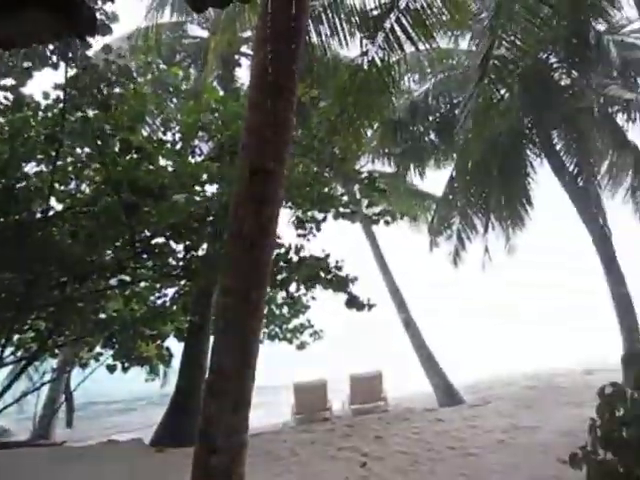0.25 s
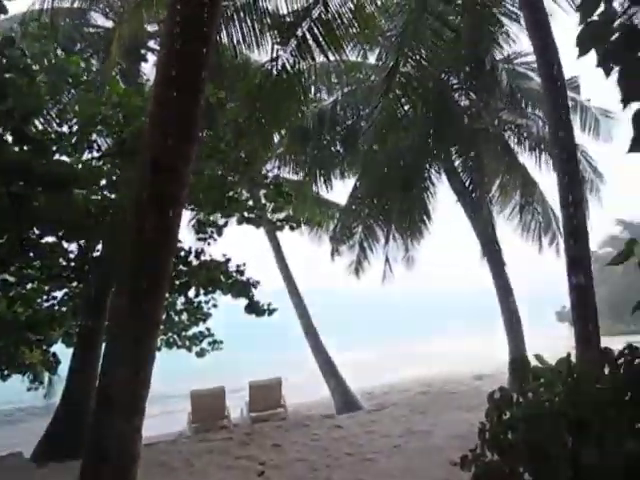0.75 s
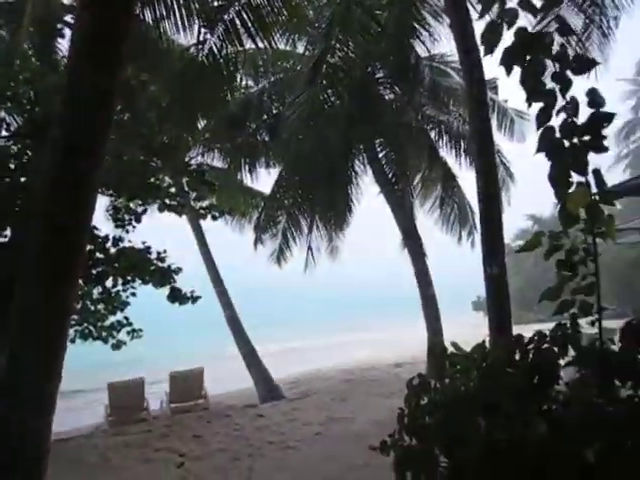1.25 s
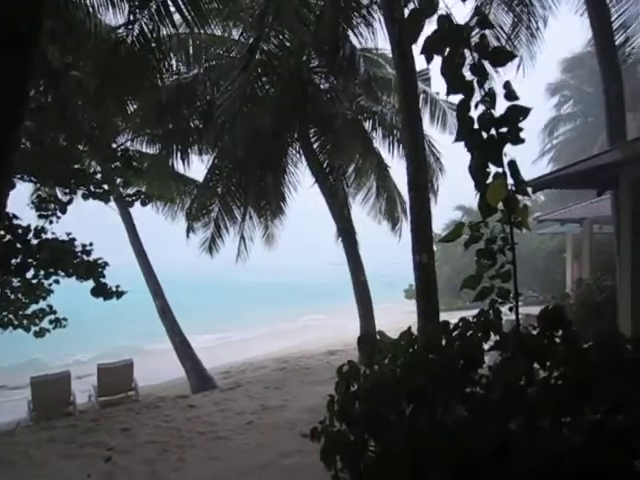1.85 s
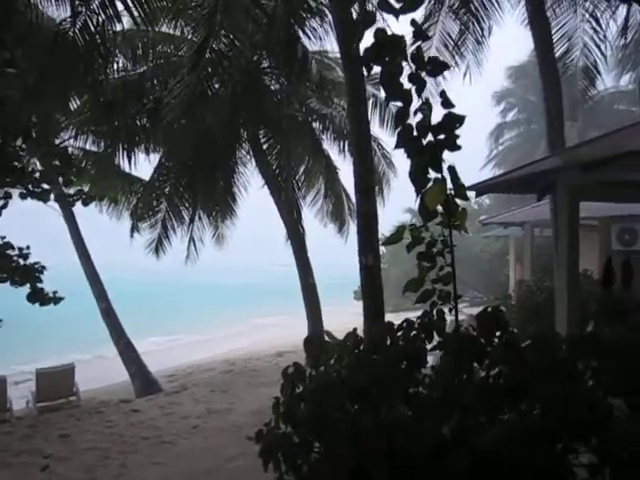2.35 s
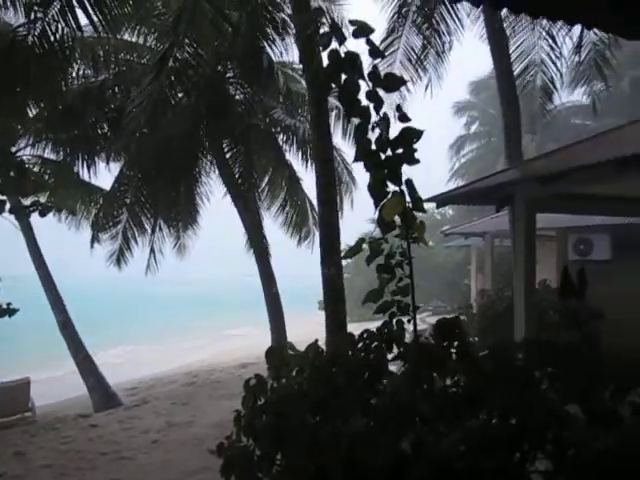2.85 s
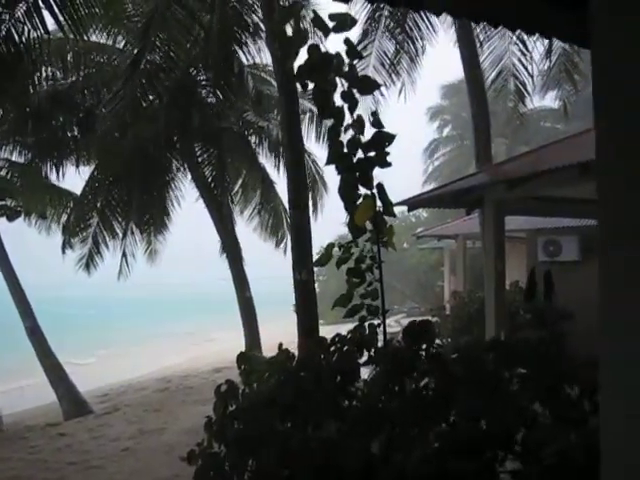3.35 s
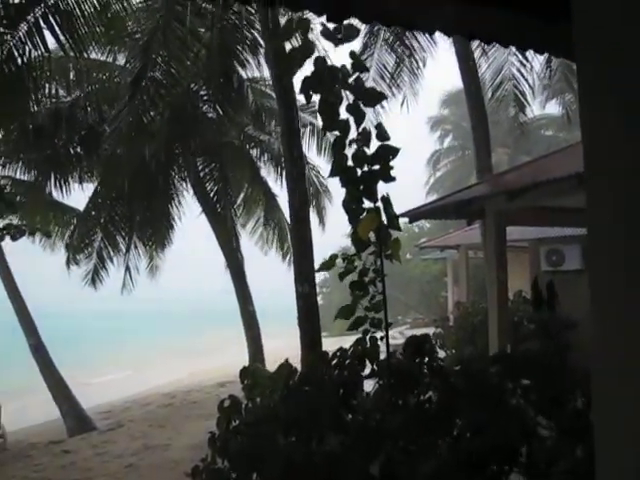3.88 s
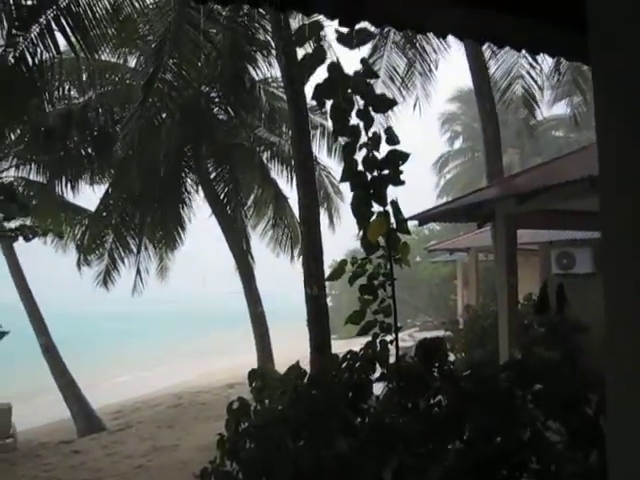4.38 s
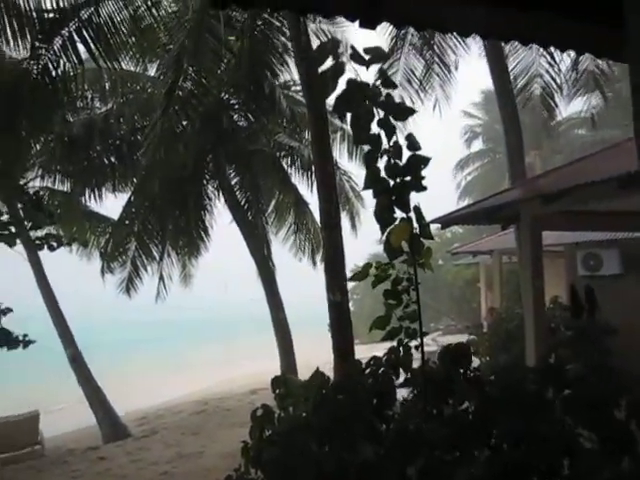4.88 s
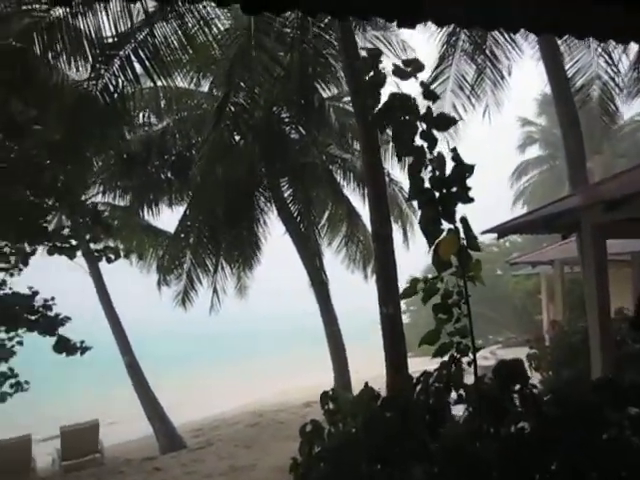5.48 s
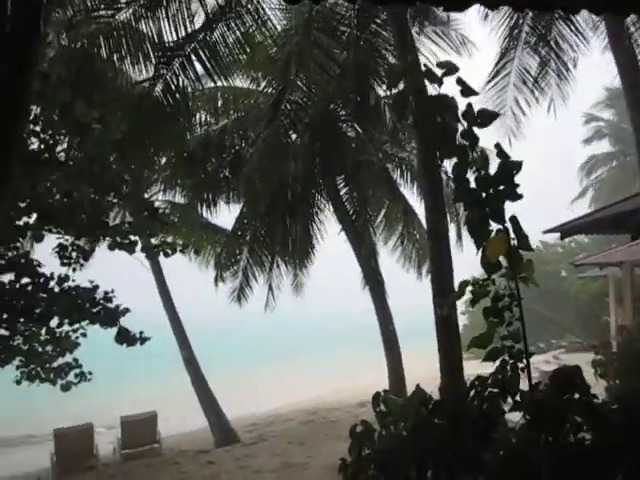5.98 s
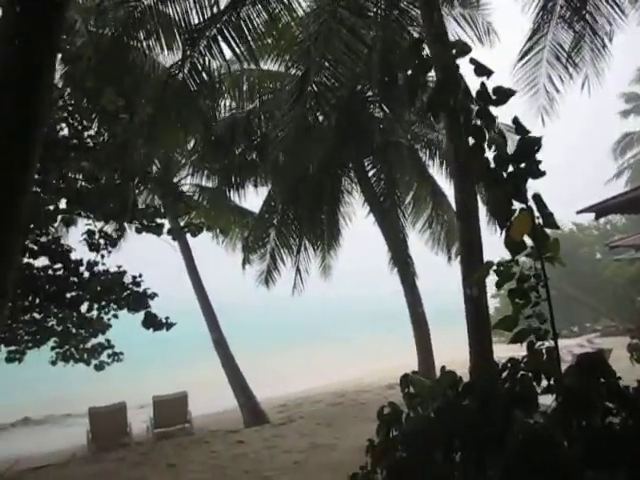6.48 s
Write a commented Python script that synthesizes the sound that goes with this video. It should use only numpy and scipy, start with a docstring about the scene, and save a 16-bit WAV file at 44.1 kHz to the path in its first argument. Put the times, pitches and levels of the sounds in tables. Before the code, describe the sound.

Heavy rain is already pouring at full strength and continues unbroken to the end, about 6.5 seconds. A wide, mid-toned wash of distant rain on beach, sea and roofs lies beneath a bright, fine-grained patter on leaves close by, with many tiny splashes. A sharper drip lands at 0.3 s. Near 1.0 s the sound almost vanishes for a few hundredths of a second, with a faint soft thump at each edge, then swells back. Dull low handling bumps cluster from 1.3 to 1.6 s, and weaker ones around 2.3 to 2.5 s, with slight rumble and crisp drips. The rain surges subtly at 3.3 s. Around 3.8 s the far wash recedes slightly and patter and roof drips become closer. Hard, short smacks hit at 3.9 and 5.9 s, the level dipping briefly after them; lighter drips fall at 4.6, 5.4 and 6.1 s. Mono, outdoors, under eaves, with limited top treble.

```python
"""A broad wash of far rain is heard first, with near drops pattering on leaves: a tropical downpour on a
palm beach, under the eaves of a hut, through a hand-held mono camera. Rain is shaped noise plus damped rings.
Fat roof drips are short noise bursts; a brief cut-out has a soft thump at each edge; handling gives dull
bumps over low rumble. As the camera turns towards the hut the wash recedes, the patter comes closer and more
drips are heard; gain control ducks after the loudest smacks."""
import sys
import numpy as np
from scipy import signal
from scipy.fft import rfft, irfft, next_fast_len
from scipy.io import wavfile
from scipy.ndimage import map_coordinates

SR = 44100
rng = np.random.default_rng(int(sys.argv[2]) if len(sys.argv) > 2 else 0)


def int16_out(signal):
    """Quantize to a 16-bit WAV file."""
    q = np.round(np.clip(np.atleast_2d(signal).T, -1, 1) * 32767)
    wavfile.write(sys.argv[1], SR, q.astype(np.int16))


N = 296793

# relative spectrum of far rain on sand, sea and roofs: f/Hz [Hz], level/dB [dB per Hz]
WASH_SPECTRUM = [(25, -37), (60, -19), (110, -13.5), (290, -7.5), (400, -5.5), (520, -1.5), (680, 0),
                 (1050, 1), (1350, -3), (1800, -3.5), (2500, -3.5), (3200, -9), (7000, -12), (15000, -39)]
# relative spectrum of drops bursting on leaves: f/Hz [Hz], level/dB [dB per Hz]
LEAF_SPECTRUM = [(200, -22), (1000, -3.5), (2500, -0.5), (3200, -1.5), (4200, -1.6), (6000, -2),
                 (9000, -1.3), (12000, -1.5), (13500, -4), (15700, -11)]
# fattest drips landing close by: t/s [s], level/dB [peak dB, before a common lift and the microphone's
# treble loss], f/Hz [centre Hz of the spray], t60/s [s of decay by 60 dB]
FAT_DRIPS = [(.2845, -13.5, 7700, .016), (2.292, -15.5, 11000, .025), (2.4887, -14, 9500, .035),
             (3.863, -7.5, 6200, .0053), (4.63, -16, 6500, .025), (5.358, -14, 10500, 0.02),
             (5.9292, -7, 8550, 0.014), (5.983, -20, 1600, .05), (6.11, -13.5, 6300, .021)]
# start and end of the cut-out: t/s [s], t/s [s]
GAP_TIMES = (0.981, 1.024)
# bumps on the camera body: t/s [s, middle], level/dB [peak dB], f/Hz [Hz]
BODY_BUMPS = [(1.268, -22.5, 200), (1.438, -14.5, 217), (1.504, -15, 290), (1.522, -15, 220),
              (1.602, -26, 55), (1.62, -19.5, 106), (1.629, -19, 310), (2.299, -21, 135), (2.314, -16, 125),
              (2.386, -26, 110), (2.486, -21, 185)]
# relative spectrum of the handling rumble: f/Hz [Hz], level/dB [dB per Hz]
RUMBLE_SPECTRUM = [(10, -7), (30, -11), (60, -3.5), (110, -6), (400, -34), (1500, -80)]
# shifts of the grip: t/s [s, start], hold/s [s], level/dB [dB of rumble]
GRIP_SHIFTS = [(1.38, .2, -36.5), (2.29, 0.28, -39.5), (5.98, .75, -55)]

WASH_DB, WASH_TURN_DB = -25.0, -1.6  # facing the beach, change over the turn
PATTER_DB, PATTER_TURN_DB = -24.75, 0.56
SWELL_DB, SWELLS_PER_S = 0.13, 4  # small random swells of the downpour
SURGE_S, SURGE_WIDTH_S, SURGE_DB = 3.26, .12, 0.5  # one brief surge of heavier rain
SHIFT_ATTACK_S, SHIFT_RELEASE_S = 0.047, 0.13  # time constants of the rumble
STILL_HAND_DB = -62  # rumble between the shifts
TURN_S, TURN_LENGTH_S = 3.8, 0.76  # middle and length of the turn from beach to hut
EAVES_PER_S, EAVES_DB, EAVES_T60_S = 4, -14, .012  # lesser drips off the roof edge
EAVES_LOW_HZ, EAVES_HIGH_HZ = 5000, 11000
TOP_HZ = 15750  # upper band limit


def amp(db):
    """Logarithmic level: decibels to amplitude ratio."""
    return 10 ** (np.asarray(db) / 20)


def unit(x):
    """Normalisation: scale to rms 1."""
    return x / np.sqrt(np.mean(x ** 2) + 1e-20)


def wobble(rate):
    """Slow random modulation: a smooth curve through rate random knots a second."""
    knots = rng.standard_normal(int(N * rate / SR) + 4)
    return map_coordinates(knots, [np.arange(N) * rate / SR])


def filtered(x, response):
    """Linear filtering: the spectrum of x times a response of frequency."""
    size = next_fast_len(N + SR // 2)
    spectrum = rfft(x, size) * response(np.fft.rfftfreq(size, 1 / SR))
    return irfft(spectrum, size)[..., :N]


def coloured(x, points):
    """Spectral shaping: x follows (f/Hz, level/dB) points on a log axis, at rms 1."""
    f, db = np.transpose(points)
    return unit(filtered(x, lambda hz: amp(np.interp(np.log(hz + 1), np.log(f), db))))


def add(track, s, sound):
    """Superposition: mix a sound into a track from time s."""
    part = track[round(s * SR):][:len(sound)]
    part += sound[:len(part)]


def drops(per_second, low_hz, high_hz, cycles, spread_db):
    """Impact excitation: random tiny damped rings whose sizes differ with distance, at rms 1."""
    draws = rng.random((int(per_second * N / SR), 4))
    when, pitch, reach, phase = draws.T[:, :, None]
    hz = low_hz + (high_hz - low_hz) * pitch
    k = np.arange(SR // 400)
    size = amp(spread_db * np.minimum(-np.log(1 - reach), 5)) * np.sqrt(hz)
    decay = np.exp(-k * hz / SR / cycles)
    rings = size * decay * np.sin(2 * np.pi * (hz * k / SR + phase))
    places = (when * N).astype(int) + k
    return unit(np.bincount(places.ravel(), rings.ravel(), N)[:N])


def downpour():
    """Level modulation of the far rain in dB: small random swells and one surge."""
    t = np.arange(N) / SR
    surge = SURGE_DB * np.exp(-((t - SURGE_S) / SURGE_WIDTH_S) ** 2)
    return SWELL_DB * wobble(SWELLS_PER_S) + surge


def far_rain():
    """Incoherent summation: distant drops blur into noise; its low patter clumps, with dull taps on fronds."""
    blur = coloured(rng.standard_normal(N), WASH_SPECTRUM) * amp(0.1 * wobble(14))
    low = filtered(blur, lambda hz: 1 / (1 + (hz / 1300) ** 6))
    high = blur - low
    clumped = low * amp(0.79 * wobble(16))
    taps = drops(per_second=800, low_hz=785, high_hz=3060, cycles=1.9, spread_db=2.5)
    return unit(high + clumped + amp(-14.0) * taps)


def leaf_patter():
    """Impulsive excitation of near bushes: ticks over a fine noise spray, arriving in flurries."""
    ticks = drops(per_second=4000, low_hz=1500, high_hz=17000, cycles=1.1, spread_db=3)
    spray = amp(5.0) * rng.standard_normal(N)
    flurries = amp(.35 * wobble(22))
    return coloured(ticks + spray, LEAF_SPECTRUM) * flurries


def splash(hz, t60, octaves):
    """Transient noise burst of a drop: a spray around hz opens fast and decays exponentially, at peak 1."""
    t = np.arange(SR // 16) / SR
    f = np.fft.rfftfreq(len(t), 1 / SR)
    band = 1 / (1 + (np.log2((f + 1) / hz) / octaves) ** 2)
    spray = unit(irfft(rfft(rng.standard_normal(len(t))) * band, len(t)))
    burst = 1000 ** (-t / t60) * (1 - np.exp(-t / (.08 * t60)))
    smack = spray * burst
    return smack / np.abs(smack).max()


def light_splashes():
    """Random arrivals: many light bursts, with pitch and decay spread evenly in octaves."""
    out = np.zeros(N)
    for when, pitch, size, life in rng.random((int(70 * N / SR), 4)):
        # the square root favours the weaker splashes
        level = amp(-17.5 - 7.4 * np.sqrt(size))
        sound = splash(3000 * 4.4 ** pitch, t60=0.0098 * 8 ** life, octaves=0.35)
        add(out, when * N / SR, level * sound)
    return out


def roof_drips():
    """Superposed transients: a few fat smacks off the eaves among many lighter splashes."""
    out = eaves_drips() + light_splashes()
    for s, db, hz, t60 in FAT_DRIPS:
        add(out, s, amp(db + 1.5) * splash(hz, t60, octaves=.42))
    # the microphone dulls the top treble of the splashes
    return filtered(out, lambda hz: 1 / np.sqrt(1 + (hz / 12800) ** 14))


def cut_out(x, depth_db, return_db, recover_s, thump_db, thump_hz):
    """Gating: an abrupt drop, then a quick swell back, with a soft thump at each edge."""
    t = np.arange(N) / SR
    start, end = GAP_TIMES
    silent = (t >= start) & (t < end)
    swell = return_db * np.exp(-np.abs(t - end) / recover_s) * (t >= end)
    # a step in the resting level leaks away
    thump = filtered(-amp(thump_db) * silent, lambda hz: 1j * hz / (thump_hz + 1j * hz))
    return x * amp(depth_db * silent + swell) + thump


def grip():
    """Envelope of the rumble: each shift of the hand rises quickly, holds and decays exponentially."""
    t = np.arange(N) / SR
    strength = amp(STILL_HAND_DB)
    for s, hold, db in GRIP_SHIFTS:
        rise = np.maximum(s - t, 0) / SHIFT_ATTACK_S
        fall = np.maximum(t - s - hold, 0) / SHIFT_RELEASE_S
        strength = np.hypot(strength, amp(db) * np.exp(-rise - fall))
    return strength


def handling():
    """Structure-borne sound: fingers push on the camera, giving short dull bumps over a low rumble."""
    out = grip() * coloured(rng.standard_normal(N), RUMBLE_SPECTRUM)
    t = np.arange(-SR // 25, SR // 25) / SR
    for s, db, hz in BODY_BUMPS:
        # a soft push flexes the case for about one cycle
        flex = np.cos(2 * np.pi * hz * t) * np.exp(-(hz * t / 0.5) ** 2)
        add(out, s + t[0], amp(db) * flex)
    return out


def turned(s):
    """Orientation of the receiver at time s: 0 facing the beach, 1 facing the hut."""
    return np.clip((s - TURN_S) / TURN_LENGTH_S + .5, 0, 1)


def eaves_drips():
    """Orientation-weighted transients: lesser roof-edge drips grow as the camera turns towards them."""
    out = np.zeros(N)
    for when, pitch in rng.random((int(EAVES_PER_S * N / SR), 2)):
        s = when * N / SR
        hz = EAVES_LOW_HZ + (EAVES_HIGH_HZ - EAVES_LOW_HZ) * pitch
        add(out, s, turned(s) * amp(EAVES_DB) * splash(hz, EAVES_T60_S, octaves=0.72))
    return out


def gain_control(x, threshold_db, slope, release_db_per_s, attack_s):
    """Dynamic compression: peaks lower the gain by a share of their excess; it then climbs back steadily."""
    level_db = 20 * np.log10(np.abs(x).max(axis=0) + 1e-9)
    over = slope * np.maximum(level_db - threshold_db, 0)
    climb = release_db_per_s * np.arange(N) / SR
    held = np.maximum.accumulate(over + climb) - climb
    pole = np.exp(-1 / (attack_s * SR))
    reduction_db = signal.lfilter([1 - pole], [1, -pole], held)
    return x * amp(-reduction_db)


def scene():
    """Superposition at one microphone: rain and handling, the same in both channels."""
    turn = turned(np.arange(N) / SR)
    wash = far_rain() * amp(WASH_DB + WASH_TURN_DB * turn + downpour())
    patter = leaf_patter() * amp(PATTER_DB + PATTER_TURN_DB * turn)
    mono = wash + patter + roof_drips() + handling()
    return np.array([mono, mono])


def record(dry):
    """Signal chain in series: gain control, the brief gap and the camera's band limit."""
    held = gain_control(dry, threshold_db=-7.5, slope=.7, release_db_per_s=40, attack_s=.003)
    broken = cut_out(held, depth_db=-33, return_db=-6.0, recover_s=0.023, thump_db=-36.5, thump_hz=4.4)
    return filtered(broken, lambda hz: hz < TOP_HZ)


dry = scene()
out = record(dry)
int16_out(out)
```